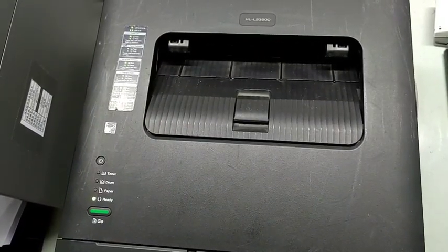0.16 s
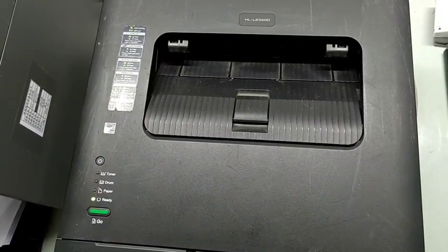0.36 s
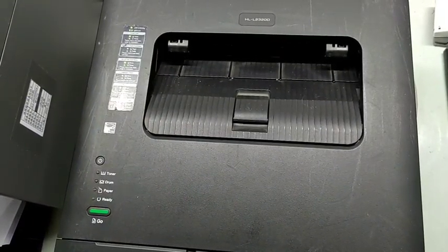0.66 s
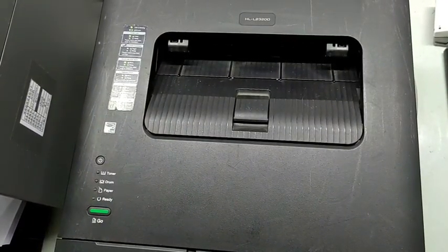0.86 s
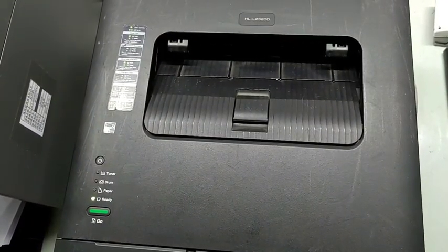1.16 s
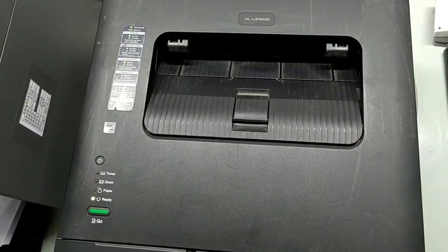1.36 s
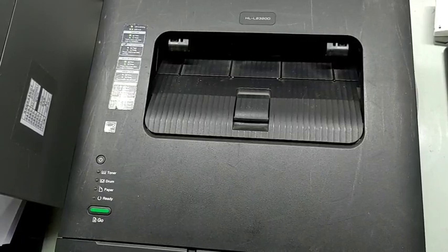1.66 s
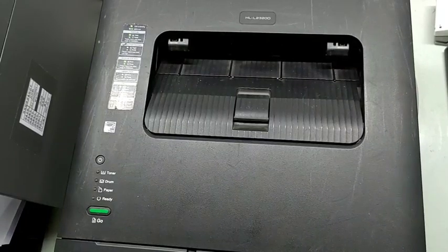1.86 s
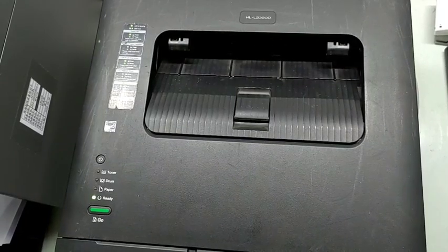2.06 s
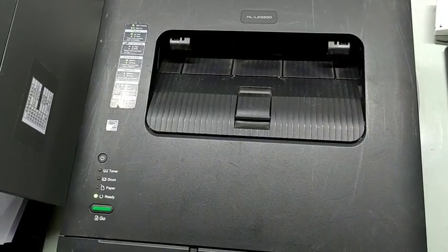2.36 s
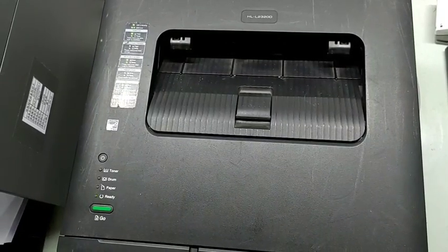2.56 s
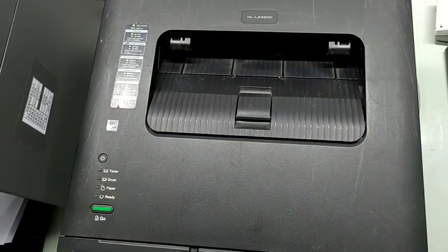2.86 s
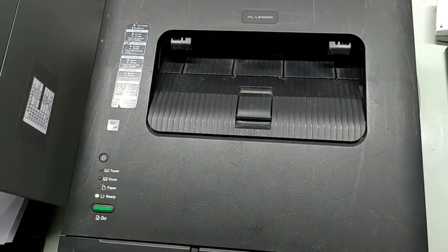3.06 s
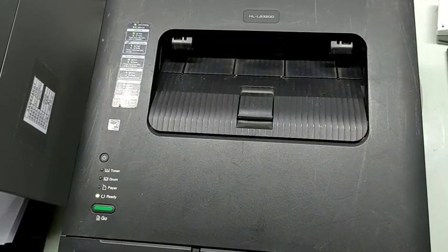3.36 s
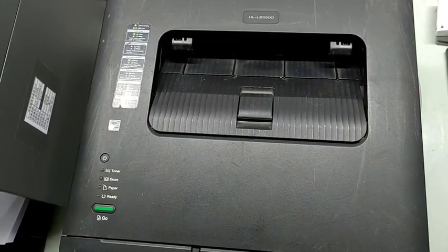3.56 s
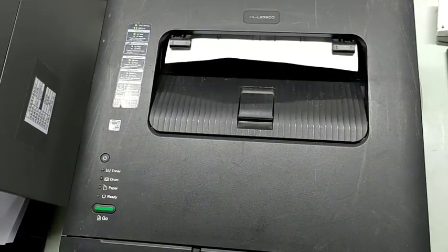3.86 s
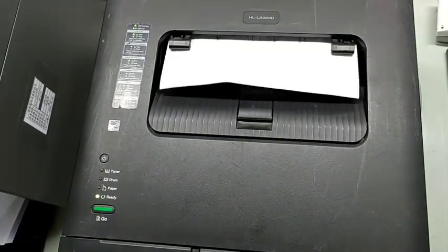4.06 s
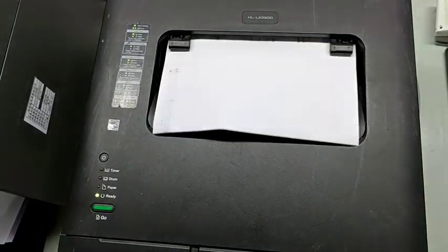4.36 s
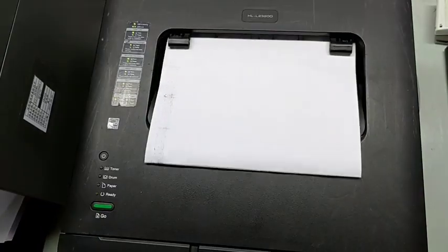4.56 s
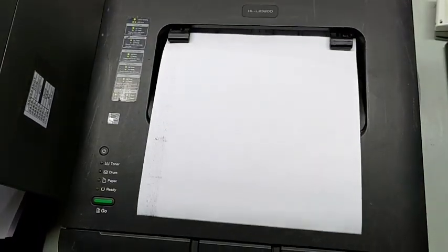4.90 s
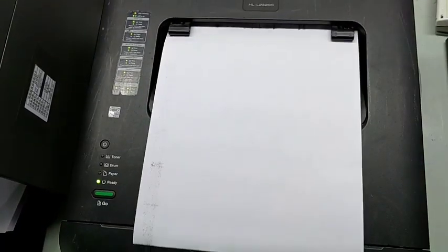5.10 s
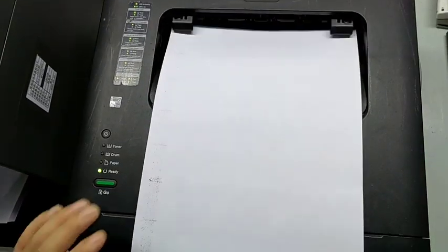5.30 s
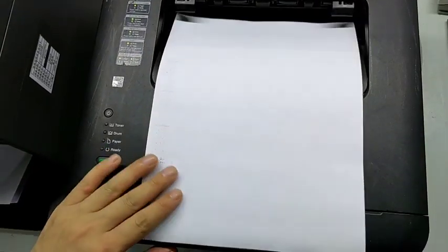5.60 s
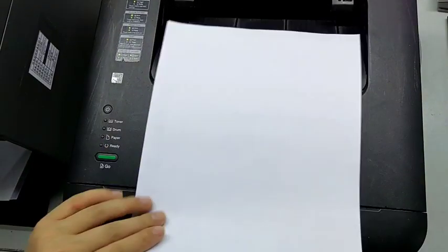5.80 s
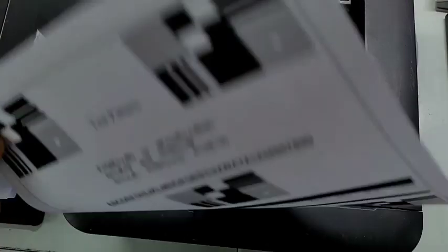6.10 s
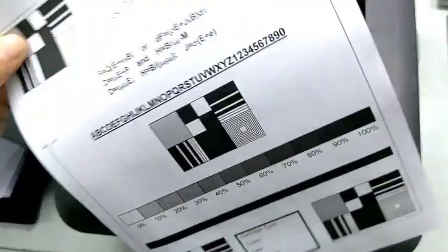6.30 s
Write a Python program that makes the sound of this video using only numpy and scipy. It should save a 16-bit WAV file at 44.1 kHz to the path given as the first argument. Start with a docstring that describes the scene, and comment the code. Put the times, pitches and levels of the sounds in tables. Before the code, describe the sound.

Close above a small laser printer indoors. Brief thin squeaks and a rising motor whine lead to a strong low thump at half a second, over a steady gear whir and fan. Sparse knocks follow, then clusters of clicks near three and four seconds. A sheet hisses out with sharp clacks past five seconds, is rustled away, and the whine falls as the mechanism sinks.

```python
"""Just above a small laser printer that feeds one sheet, heard by a phone with two microphone ports.
A fan hums as noise and steady tones; the mirror motor whines up and down as one gliding line; the gear
train whirs as noise through panel resonances over its mesh tones, then sinks. Thin sliding tones squeak
at the start, the clutch thumps as decaying sines, levers and paper edges click and tap the casing's modes,
and the sheet snaps as bright bursts, scrapes and hisses out as grainy noise and is picked up."""
import sys
import numpy as np
from scipy import signal
from scipy.fft import rfft, irfft, next_fast_len
from scipy.io import wavfile
from scipy.ndimage import uniform_filter1d

SR = 44100
rng = np.random.default_rng(int(sys.argv[2]) if len(sys.argv) > 2 else 0)


def wrap_up_sound(samples):
    """Save the sound to the file named by the first command line argument, as 16-bit audio."""
    columns = np.atleast_2d(samples).T
    # keep every value between -1 and 1, then stretch to whole-number steps
    tamed = np.clip(columns, -1, 1)
    steps = np.round(tamed * 32767).astype(np.int16)
    wavfile.write(sys.argv[1], SR, steps)


N = 284002
T = np.arange(N) / SR

# casing resonances that clicks and taps ring: (frequency [Hz], width [Hz], level [dB])
CASING_MODES = [(620, 110, -3), (880, 100, -5), (1200, 100, -3), (1590, 80, -3), (1750, 80, 0),
                (2000, 70, -3), (2280, 80, -1), (2530, 80, -3), (2740, 90, 0), (2900, 90, -2),
                (3260, 110, -2), (3420, 110, -2), (3860, 110, -3), (4600, 150, -6), (5400, 200, -5),
                (6050, 160, -5), (6550, 180, -5)]
# colour of rustling paper: (frequency [Hz], relative level [dB])
PAPER_COLOUR = [(1200, 6.5), (2600, 14.5), (5500, 2), (7200, 2.5), (11000, -12), (13000, -9), (15000, -11)]


def undb(db):
    """Decibels to an amplitude factor."""
    return 10 ** (np.asarray(db) / 20)


def level(x, db):
    """Scale x to an RMS level in dB."""
    return x * undb(db) / np.sqrt(np.mean(x ** 2))


def along(table, hz):
    """Read a (frequency [Hz], value) table on a log-frequency axis."""
    at, value = np.transpose(table)
    return np.interp(np.log(hz + 1), np.log(at + 1), value)


def peaks(table, hz):
    """Gain of a set of resonances, summed in power: (frequency [Hz], width [Hz], level [dB])."""
    return np.sqrt(sum(undb(db) ** 2 / (1 + (2 * (hz - f) / width) ** 2) for f, width, db in table))


def shape(x, gain):
    """Filter x by gain(hz) in the spectrum."""
    size = next_fast_len(len(x))
    spectrum = rfft(x, size) * gain(np.fft.rfftfreq(size, 1 / SR))
    return irfft(spectrum, size)[:len(x)]


def noise(table):
    """Gain that gives unit white noise the table's dB per Hz."""
    return lambda hz: undb(along(table, hz)) * np.sqrt(SR / 2)


def walk(rate):
    """Random levels held for 1 / rate s and smoothed twice; spread near 1."""
    hold = int(SR / rate)
    steps = np.repeat(rng.standard_normal(N // hold + 1), hold)
    return 1.65 * uniform_filter1d(uniform_filter1d(steps, hold), hold)[:N]


def tone(hz, db, waver_db, drift, pace=1):
    """A sine of RMS level db whose level wavers and whose phase drifts."""
    phase = 2 * np.pi * np.cumsum(hz * np.ones(N)) / SR + drift * walk(9 * pace) + 2 * np.pi * rng.random()
    return np.sqrt(2) * undb(db + waver_db * walk(14 * pace)) * np.sin(phase)


def add(out, s, x):
    """Mix x into out from s seconds on."""
    k = int(s * SR)
    out[k:k + len(x)] += x[:N - k]


def blow(rise, t60):
    """Envelope of a blow: linear rise to 1, then a decay of 60 dB in t60 s."""
    t = np.arange(int(.3 * SR)) / SR
    return np.minimum(t / max(rise, 1e-4), 1) * 1000. ** (-np.maximum(t - rise, 0) / max(t60, .005))


def friction(size):
    """Noise in fine uneven grains, as of surfaces rubbing."""
    return (rng.standard_normal(N) * undb(1.4 * walk(300) + 2.0 * walk(40)))[:size]


def treble(hz):
    """Gain of the crisp top of paper."""
    return undb(along(PAPER_COLOUR, hz)) / (1 + (5000 / (hz + 1)) ** 6)


def fan():
    """Moving air makes noise that wavers a little, with steady hum tones."""
    # spectrum of the air: (frequency [Hz], density [dB per Hz])
    air_colour = [(20, -81), (40, -78.5), (100, -70.5), (270, -72), (450, -84), (700, -79), (1300, -102),
                  (2500, -96), (4500, -100), (7000, -106), (11000, -118), (15000, -125)]
    # hum: (frequency [Hz], level [dB])
    hum_tones = [(200, -56.5), (1000, -60.5)]
    air = shape(rng.standard_normal(N) * undb(1.0 * walk(5.89)), noise(air_colour))
    return air + sum(tone(hz, db, waver_db=3.0, drift=0.5, pace=1.5) for hz, db in hum_tones)


def whine():
    """The mirror's facets sing one clean line that follows the motor's speed."""
    # level of the whine, dipping while the sheet covers the outlet: (time [s], level [dB])
    whine_level = [(0, -78), (.18, -72), (.22, -65), (.3, -62), (.5, -53.5), (1.2, -55.5), (2.5, -51.5),
                   (3.3, -56.5), (4.5, -55), (4.62, -63), (4.78, -55), (4.9, -69), (5.235, -68),
                   (5.255, -53.5), (5.42, -48.5), (5.5, -57), (5.97, -60), (6.01, -68), (6.04, -62),
                   (6.08, -67), (6.12, -69), (6.3, -69), (6.39, -66), (6.44, -68)]
    full_hz, settled_s, ease_s, cut_s = 4061, .385, .12, 5.88  # power is cut at cut_s
    run_up_hz_per_s, run_down_hz_per_s = 1540, 1020
    lag_s = uniform_filter1d(np.maximum(settled_s - T, 0), int(ease_s * SR), mode="nearest")
    hz = full_hz - run_up_hz_per_s * lag_s - run_down_hz_per_s * np.maximum(T - cut_s, 0)
    waver_db = .5 + 1.5 * (T > cut_s)  # less steady as it runs down
    return tone(hz, np.interp(T, *np.transpose(whine_level)), waver_db=waver_db, drift=.05)


def gears():
    """Teeth scrape once per mesh and shake the panels; the load is uneven, octave by octave."""
    # gear load: (time [s], level [dB])
    drive_load = [(0, -1), (1.24, 0), (1.6, 1.5), (2.4, 0), (3, 1), (3.44, -0.5), (3.96, 2), (6, 0.5)]
    # mesh tones ahead of the load: (multiple of the mesh rate, level [dB])
    mesh_tones = [(1, -60), (2, -62), (3, -56.5), (4, -57), (5, -55.5)]
    # spectrum of the whir ahead of panels and load: (frequency [Hz], density [dB per Hz])
    whir_colour = [(30, -100), (70, -74), (170, -75), (400, -78.5), (800, -76), (1200, -77.5), (1380, -92),
                   (2000, -91), (3500, -89.5), (5200, -99), (6500, -104), (8600, -114), (11000, -108),
                   (12500, -114), (15000, -122)]
    # panel resonances: (frequency [Hz], width [Hz], level over the whir [dB])
    panel_modes = [(77.9, 4.7, 8.5), (130, 51, 0.5), (205.2, 5.8, 9), (279.9, 17.8, 15.5), (328, 23.5, 8),
                   (523.7, 24.3, 10), (626, 65, 6.5), (728, 45, 9), (1007, 44, 3.5), (1583, 53, 14),
                   (1747, 65, 11.5), (2202, 21, 5), (2743, 118, 8.5), (3310, 17, 10)]
    mesh_hz = 213
    stop_s, coast_s, stop_db = 5.98, 0.12, -11  # sinks by stop_db within coast_s

    teeth = 1 + 0.092 * np.sin(2 * np.pi * mesh_hz * T)
    shaken = 0
    for mid_hz in 40 * 2. ** np.arange(10):
        scrape = rng.standard_normal(N) * teeth * undb(1.06 * walk(4.05) + 1.0 * walk(24.94))
        # octave bands that cross-fade into each other
        band = shape(scrape, lambda hz: np.cos(np.clip(np.log2((hz + 1) / mid_hz), -1, 1) * np.pi / 2))
        shaken = shaken + band
    for panel in panel_modes:  # each panel is shaken unevenly, in its own time
        shake = rng.standard_normal(N) * undb(3.03 * walk(14.0))
        shaken = shaken + shape(shake, lambda hz: peaks([panel], hz))
    whir = shape(shaken, noise(whir_colour))
    mesh = sum(tone(k * mesh_hz, db, waver_db=4.0, drift=0.9, pace=1.5) for k, db in mesh_tones)
    coast_db = stop_db * np.clip((T - stop_s) / coast_s, 0, 1)
    return (whir + mesh) * undb(np.interp(T, *np.transpose(drive_load)) + coast_db)


def thin_tones():
    """Thin wavering tones that slide a little: squeaks at the start, one faint high tone at the end."""
    # (start [s], length [s], level at the height [dB], first pitch [Hz], last pitch [Hz])
    tone_list = [(0.022, 0.077, -62, 3270, 3300), (0.093, .05, -55, 3360, 3400),
                 (.15, .04, -57, 3420, 3380), (.12, .04, -59, 3580, 3660), (0.185, 0.14, -54, 3310, 3380),
                 (0.188, 0.076, -52, 3180, 3305), (.234, 0.036, -48.5, 2730, 2700),
                 (.272, .035, -47, 2690, 2700), (.29, 0.088, -57, 3340, 3280), (6.2, .26, -67, 4570, 4730)]
    out = 0
    for start, length, db, first_hz, last_hz in tone_list:
        part = np.clip((T - start) / length, 0, 1)
        hz = first_hz + (last_hz - first_hz) * part
        arch = np.sqrt(np.abs(np.sin(np.pi * part))) * (part < 1)
        out = out + tone(hz, db, waver_db=2.5, drift=2.5, pace=5.5) * arch
    return out


def thumps():
    """A blow swings the body at a low pitch, with weaker modes below and above it."""
    # clutch and tray blows: (time [s], peak level of the main mode [dB], pitch [Hz])
    thump_list = [(0.516, -17, 121), (.555, -30, 91.5), (0.591, -29.5, 75), (1.362, -27, 111),
                  (1.393, -30.5, 108), (1.756, -41, 130), (2.529, -29, 281), (2.806, -32, 226),
                  (2.901, -30, 282), (3.04, -33, 320), (3.159, -29, 268), (3.978, -35, 111),
                  (4.62, -40, 90.5), (5.979, -31, 294)]
    out = np.zeros(N)
    swing = blow(rise=0.013, t60=0.12)
    for s, db, hz in thump_list:
        turn = 2 * np.pi * hz * np.arange(len(swing)) / SR
        modes = np.sin(turn) + .2 * np.sin(.64 * turn) + .15 * np.sin(1.7 * turn)
        add(out, s, undb(db) * swing * modes)
    return out


def clicks():
    """Each is a short rattle into the casing, strongest near its centre, with a crisp top and dull bottom."""
    # levers and paper edges: (time [s], level at the top of the blow [dB], centre [Hz], width [Hz],
    # treble relative to that [dB], bass relative to that [dB])
    click_list = [(0.513, -38.5, 1010, 400, -31, -4), (1.444, -55.5, 1310, 500, -30, 23.5),
                  (1.7877, -45.5, 1270, 600, -24, 0), (2.808, -34.5, 1280, 1600, -23, 0),
                  (2.912, -44, 1690, 1600, -27, 6), (3.0, -36.5, 3370, 2500, -5, -1),
                  (3.095, -42, 1630, 400, -34, -2), (3.15, -44.5, 1750, 900, -35, -12),
                  (3.44, -42, 2630, 400, -6, -10), (3.657, -37, 2800, 900, -15, 2),
                  (3.7892, -32, 2270, 920, -33, -4.5), (3.817, -39, 2840, 1200, -17, 4.5),
                  (3.872, -33.5, 1580, 1200, -32, -2), (3.8897, -45, 2070, 1200, -35, -12),
                  (3.9834, -39, 2300, 800, -26, 8.5), (4.636, -43, 1550, 900, -25, -11),
                  (5.1211, -26.5, 2900, 2010, -21, -21), (5.144, -45, 2690, 2010, -18, -22),
                  (5.359, -28, 3100, 2500, -15, -17), (5.379, -31, 2850, 2200, -24, -6),
                  (5.476, -37.5, 2290, 600, -1.5, -24), (5.543, -46.5, 2460, 1010, 0, -26),
                  (5.736, -35, 3150, 3000, -17, -15), (5.8182, -45.5, 3200, 706, -5.5, -8),
                  (5.89, -43, 6000, 2000, -17, -12), (5.905, -36, 5500, 1200, -14, -5),
                  (6.243, -50, 2670, 900, -22.5, 0)]
    out = np.zeros(N)
    lead = int(.01 * SR)  # silence ahead of the blow, taken off again when it is placed
    force = np.roll(blow(rise=0.002, t60=0.12), lead) * (np.arange(int(.3 * SR)) >= lead)
    for s, db, mid_hz, width, treble_db, bass_db in click_list:
        chance = rng.standard_normal((2, len(force)))
        # the contact chatters: bounces a millisecond or two apart
        bounce = uniform_filter1d(chance[0], size=50) * np.sqrt(50)
        rattle = chance[1] * undb(2.2 * bounce) * force
        ring = shape(rattle, lambda hz: np.hypot(peaks(CASING_MODES, hz), undb(-5.5))
                     * peaks([(mid_hz, width, 0)], hz) ** 2)
        crisp = shape(rattle, treble)
        dull = shape(rattle, lambda hz: peaks([(690, 1020, 0)], hz) ** 4)
        parts = level(ring, db) + level(crisp, db + treble_db) + level(dull, db + bass_db)
        add(out, s - lead / SR, parts * np.sqrt(np.mean(force ** 2)))
    return out


def taps():
    """Each hard single tap sets the casing modes near its centre ringing freely."""
    # (time [s], peak level [dB], centre [Hz], width [Hz])
    tap_list = [(1.9255, -35, 2100, 500), (1.934, -36, 3860, 600), (1.949, -32, 4300, 1200),
                (2.8095, -30, 800, 600), (2.816, -28, 650, 500), (2.8213, -27, 1200, 300),
                (2.9125, -23.5, 620, 400), (2.9155, -34.5, 2000, 500), (2.9185, -28, 750, 600),
                (3.002, -28, 3750, 500), (3.006, -29.5, 1210, 400), (3.7897, -28, 2350, 300),
                (3.7948, -29, 2490, 700), (3.7988, -28, 2200, 703), (3.817, -41, 2900, 900),
                (3.8751, -30.5, 1500, 900), (3.891, -35, 2100, 900), (3.905, -39, 2250, 400),
                (3.9835, -27.5, 2310, 300), (3.987, -27, 2400, 500), (4.907, -31, 2600, 600),
                (4.939, -31.5, 1710, 300), (5.1239, -19.5, 1770, 250), (5.1242, -20.5, 2900, 300),
                (5.1286, -23, 2800, 400), (5.264, -37, 1660, 400), (5.271, -31, 1590, 500),
                (5.3614, -17, 6550, 400), (5.3615, -19.5, 3420, 400), (5.3645, -28, 6050, 300),
                (5.3663, -22.5, 2770, 400), (5.370, -39, 6000, 300), (5.378, -30, 4000, 800),
                (5.381, -26, 3260, 600), (5.384, -26, 2900, 1200), (5.387, -25.5, 1670, 700),
                (5.391, -32, 2500, 1500), (5.479, -34, 2280, 400), (5.651, -32, 1640, 400),
                (5.8908, -33, 6050, 1200), (5.9073, -30, 5400, 700)]
    push_s = 0.0014  # length of the contact
    out, t = np.zeros(N), np.arange(int(.06 * SR)) / SR
    mode_hz, mode_width, mode_db = np.transpose(CASING_MODES)[:, :, None]
    signs = np.sign(rng.standard_normal((len(tap_list), len(CASING_MODES), 1)))
    for (s, db, mid_hz, width), sign in zip(tap_list, signs):
        share = sign * undb(mode_db) * peaks([(mid_hz, width, 0)], mode_hz) ** 2
        modes = share * np.exp(-np.pi * mode_width * t) * np.sin(2 * np.pi * mode_hz * t)
        ring = np.sum(modes, axis=0) * np.minimum(t / max(push_s, 1e-4), 1)
        add(out, s, undb(db) * ring / np.abs(ring).max())
    return out


def snaps():
    """Paper snaps in short bright bursts: placed single ones, and a random fading crackle as it bends."""
    # single snaps: (time [s], level ahead of the decay [dB], centre [Hz])
    snap_list = [(3.0025, -52, 8950), (3.445, -44, 9000), (3.7915, -50, 13000), (3.7975, -48, 11040),
                 (3.8187, -49, 7000), (3.8245, -44, 8000), (5.363, -44, 8500), (5.48, -42, 10000),
                 (5.739, -40.5, 11000), (5.8915, -52, 7960), (5.899, -56, 9000), (5.909, -49, 7950),
                 (5.917, -50, 9000)]
    # crackle: (start [s], length [s], lowest level at the start [dB], rate [crackles per s])
    crackle_list = [(2.996, .1, -58, 350), (3.79, .2, -54.5, 350), (5.891, .24, -54.5, 390)]
    spread_db, fade_db, t60_s = 2.5, -14, .022
    rows = list(snap_list)
    for start, length, db, rate in crackle_list:
        when, size, pitch = rng.random((200, 3))[:int(rate * length)].T
        dbs = db + fade_db * when - spread_db * np.log(size)  # a few stand well above the rest
        rows += list(zip(start + length * when, dbs, 5000 * 2.6 ** pitch))
    out, t = np.zeros(N), np.arange(512) / SR
    for s, db, mid_hz in rows:
        burst = shape(rng.standard_normal(len(t)), lambda hz: peaks([(mid_hz, 0.51 * mid_hz, 0)], hz) ** 2)
        add(out, s, level(burst, db) * 1000. ** (-t / max(t60_s, .002)))
    return out


def scrapes():
    """Short rubs of grainy noise around one pitch swell and die away."""
    # rollers, clutch and sheet: (start [s], length [s], level at the top of the swell [dB],
    # centre [Hz], width [Hz], treble relative to that [dB])
    scrape_list = [(0.137, 0.3, -49.5, 3100, 700, -38), (0.501, 0.17, -42.5, 2220, 3080, -43),
                   (0.505, 0.16, -36, 850, 600, -50), (1.92, 0.075, -45.5, 3600, 2360, -45),
                   (2.498, 0.23, -34.5, 238, 152, -30), (2.986, 0.11, -44.5, 1610, 500, -6.5),
                   (3.423, 0.23, -51.5, 2700, 120, -9), (3.65, 0.071, -45.5, 2780, 2970, -23),
                   (3.78, 0.18, -41.5, 2100, 2960, -35), (3.94, 0.05, -37, 640, 250, -36),
                   (4.79, 0.7, -51, 2740, 499, -30), (4.899, 0.072, -39, 2350, 2200, -12.5),
                   (5.252, 0.06, -43, 2070, 2200, -43), (5.647, 0.043, -40, 1800, 1500, -27),
                   (5.682, 0.1, -35, 650, 144, -40), (5.731, 0.046, -39, 3040, 3500, -25),
                   (5.877, 0.12, -52, 5950, 3050, 0), (5.951, 0.16, -37, 276, 120, -21),
                   (6.13, 0.48, -53.5, 2850, 2020, -33)]
    swell_share, swell_bend = 0.18, 0.64  # part of the length spent swelling; roundness of the shape
    out = np.zeros(N)
    rub = friction(size=N)
    for start, length, db, mid_hz, width, treble_db in scrape_list:
        span = slice(int(start * SR), int((start + length) * SR))
        body = shape(rub[span], lambda hz: peaks([(mid_hz, width, 0)], hz) ** 2
                     / (1 + (mid_hz / 5 / (hz + 1)) ** 4))
        crisp = shape(rub[span], treble)
        top_s = np.clip(swell_share, .05, .9) * length
        swell = np.interp(T[span] - start, [0, top_s, length], [0, 1, 0]) ** swell_bend
        out[span] += (level(body, db) + level(crisp, db + treble_db)) * swell
    return out


def sliding_sheet():
    """The moving sheet hisses as friction noise, under a fluttering airy layer."""
    # sliding over guides, then lifted away: (time [s], hiss level [dB], airy top level [dB])
    slide_levels = [(0, -86, -92), (3.4, -59.5, -85), (3.6, -60, -65), (3.78, -52, -65), (3.8, -61, -57),
                    (4.2, -62, -64), (4.701, -57.5, -79), (5.3, -56, -78), (5.7, -50.5, -65),
                    (5.885, -55, -70), (5.895, -47, -62), (6.02, -55.5, -52), (6.14, -54.5, -68),
                    (6.25, -55, -66), (6.36, -72, -88), (6.44, -77, -90)]
    hiss = shape(friction(size=N), lambda hz: undb(along(PAPER_COLOUR, hz)) / (1 + (900 / (hz + 1)) ** 4))
    flutter = rng.standard_normal(N) * undb(3.1 * walk(12) + 2.0 * walk(150))
    air = shape(flutter, lambda hz: 1 / (1 + (9500 / (hz + 1)) ** 8))
    at, hiss_db, air_db = np.transpose(slide_levels)
    return level(hiss, 0) * undb(np.interp(T, at, hiss_db)) + level(air, 0) * undb(np.interp(T, at, air_db))


def scene():
    """Mix all sources at two ports that differ in level, phase and delay, and share only part of the noise."""
    # phase between the ports: (frequency [Hz], lead of the left [rad])
    port_phase = [(0, 0), (1550, 1.34), (2240, 7.5), (3530, 9), (4130, 6.5), (4820, 12.5), (7410, 1),
                  (8100, 3), (8530, -32), (9470, -8), (10200, 5.5), (13800, 12.5), (14000, 21), (15200, 18)]
    # level between the ports: (frequency [Hz], left minus right [dB])
    port_balance = [(60, -1), (110, 2), (200, -1), (380, 0.5), (700, 2.5), (1290, 2.5), (2380, 0.5),
                    (4400, -1), (8120, 0), (15000, 2.5)]
    # likeness of the ports: (frequency [Hz], likeness [0-1])
    port_likeness = [(30, .96), (100, .985), (300, .94), (700, .82), (1500, .7), (1900, .62), (4000, .62),
                     (5200, .42), (10000, .45)]
    whine_lag_s, tap_lag_s = 5.6e-5, 8e-5  # by which the right port hears late

    def delay(lag_s):
        return lambda hz: np.exp(-2j * np.pi * hz * lag_s)

    def like(hz):
        return np.clip(along(port_likeness, hz), 0, 1)

    def late(hz):
        return np.exp(-1j * np.interp(hz, *np.transpose(port_phase)))

    # the right port hears partly the same noise, partly a second, independent draw of the same layers
    shared, independent = (fan() + gears() + clicks() + snaps() + scrapes() + sliding_sheet()
                           for _ in range(2))
    shared = shared + thumps()
    facets, hard = whine(), taps() + thin_tones()
    left = shared + facets + hard
    right = shape(shared, lambda hz: like(hz) * late(hz))
    right = right + shape(independent, lambda hz: np.sqrt(1 - like(hz) ** 2))
    right = right + shape(facets, delay(whine_lag_s)) + shape(hard, delay(tap_lag_s))
    return np.array([shape(left, lambda hz: undb(along(port_balance, hz) / 2)),
                     shape(right, lambda hz: undb(-along(port_balance, hz) / 2))])


def record(dry):
    """The phone's ports colour the sound; a steep low-pass cuts the top."""
    # response of the ports: (frequency [Hz], gain [dB])
    port_response = [(25, 0.5), (700, -2), (1500, 2), (6600, 3.5), (7600, -6), (8800, -9.5), (10800, 0.5),
                     (12500, -0.5), (15300, -12)]
    top_hz = 15400
    heard = np.array([shape(side, lambda hz: undb(along(port_response, hz))) for side in dry])
    return signal.sosfilt(signal.ellip(10, .2, 80, top_hz, fs=SR, output="sos"), heard)


dry = scene()
out = record(dry)
wrap_up_sound(out)
```